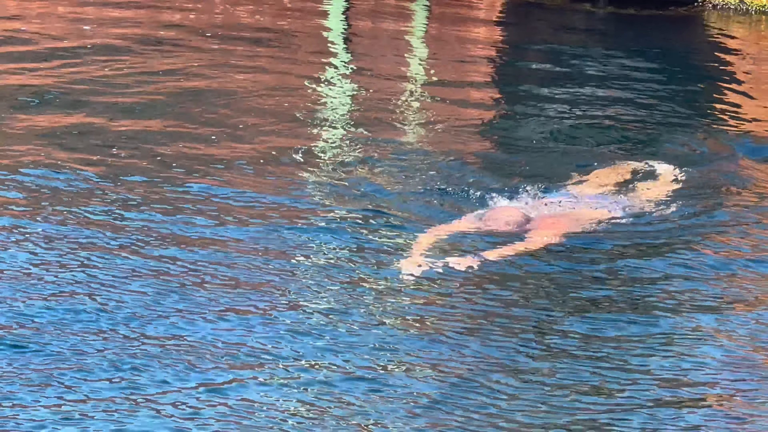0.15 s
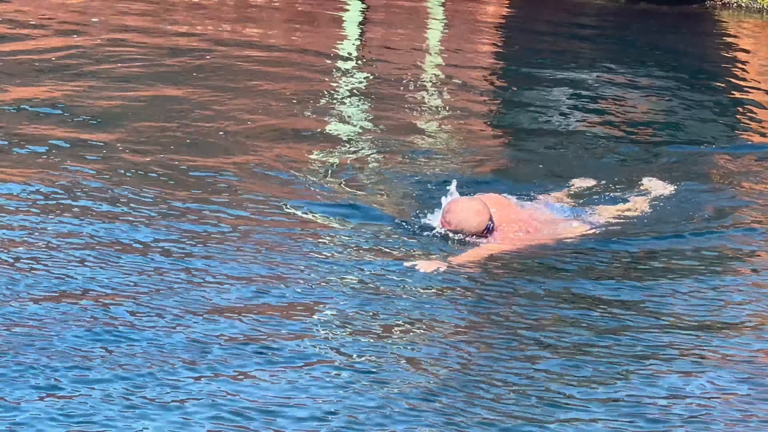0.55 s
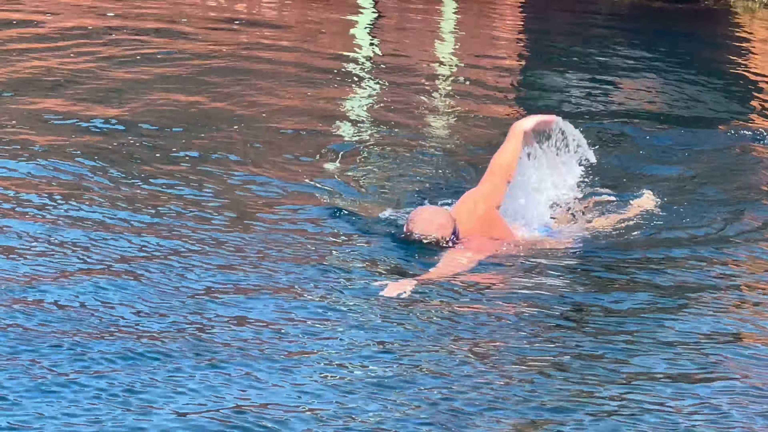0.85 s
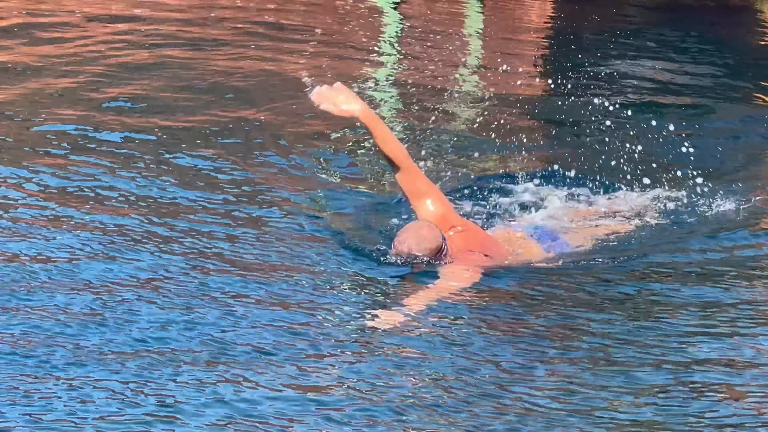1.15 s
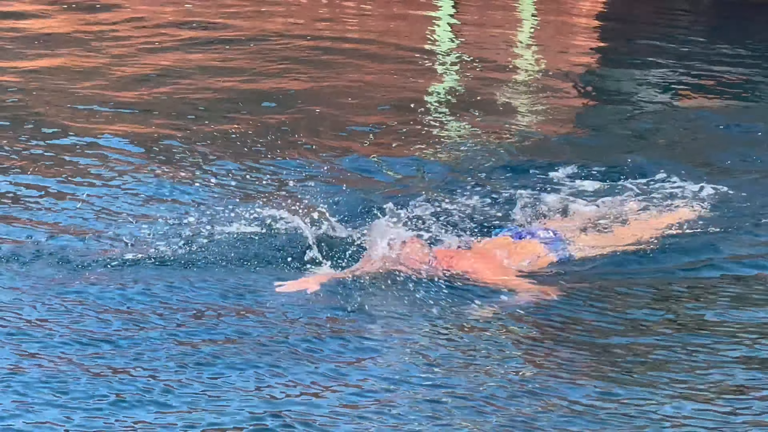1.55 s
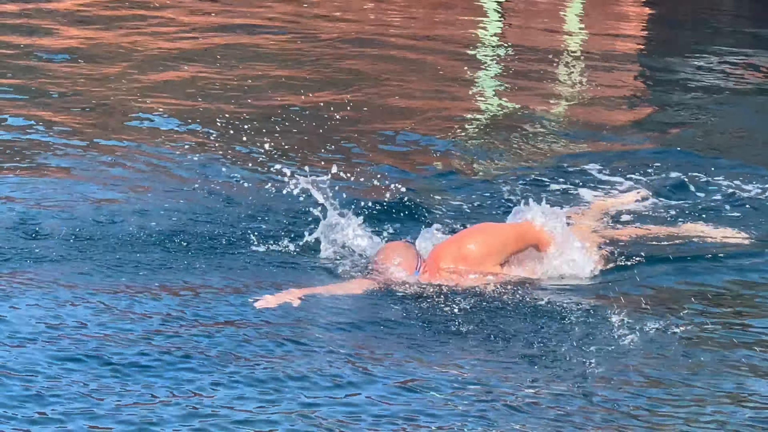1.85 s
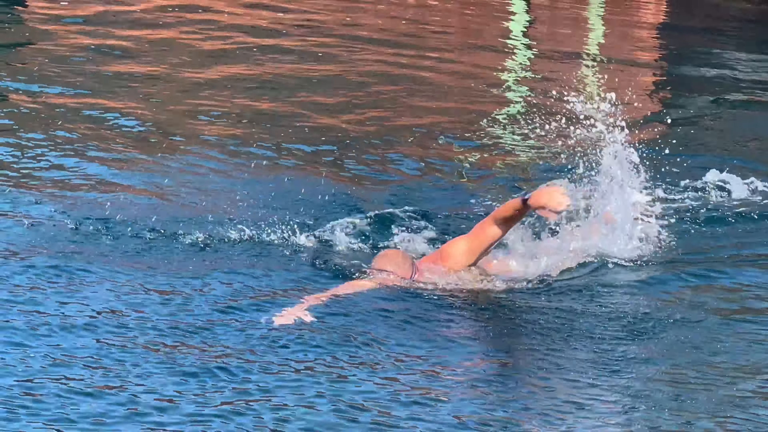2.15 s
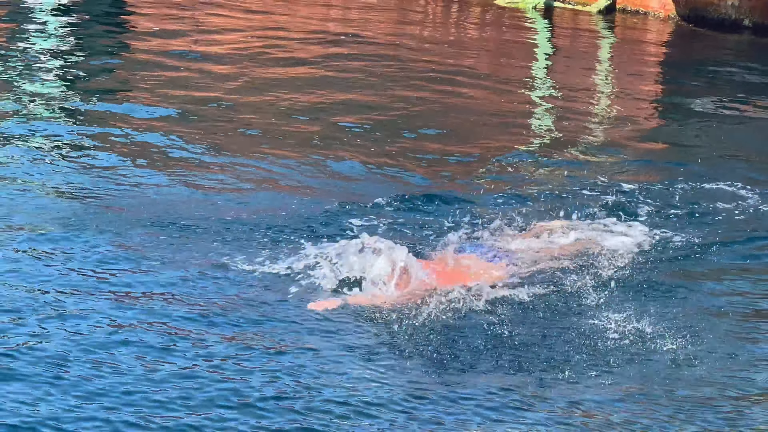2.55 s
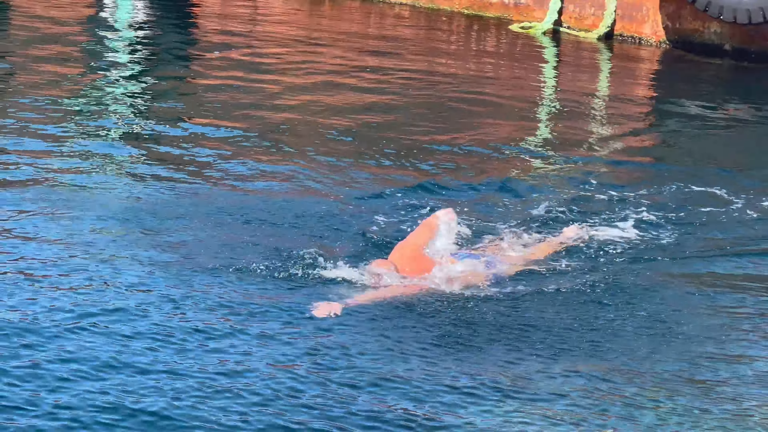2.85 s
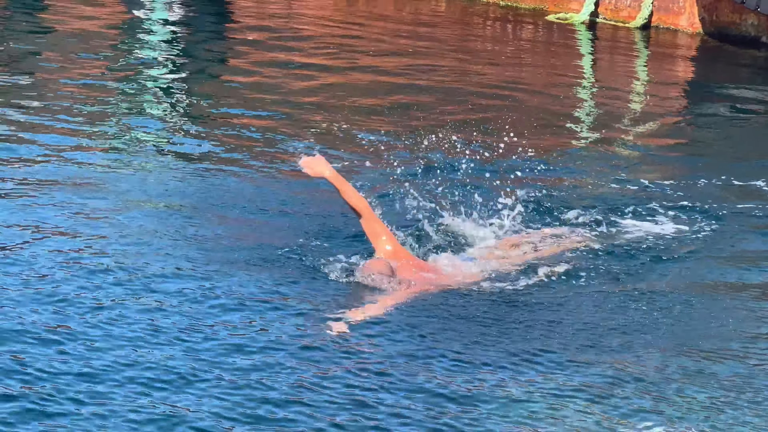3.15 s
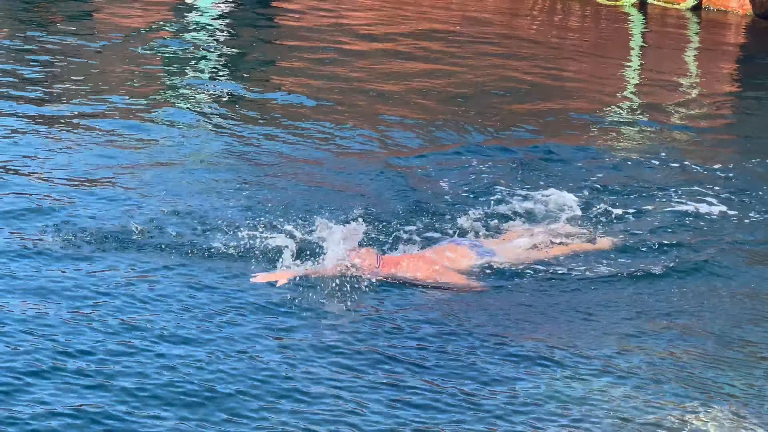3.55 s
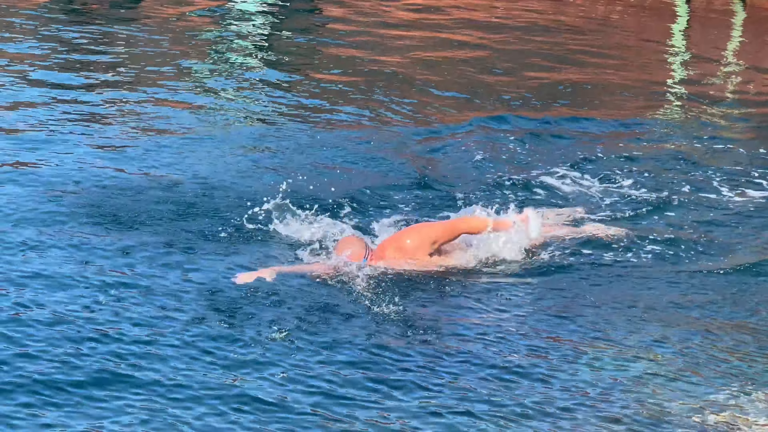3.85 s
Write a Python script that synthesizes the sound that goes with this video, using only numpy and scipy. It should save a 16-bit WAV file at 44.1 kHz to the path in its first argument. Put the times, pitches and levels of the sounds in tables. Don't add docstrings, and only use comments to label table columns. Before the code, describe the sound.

A swimmer's crawl strokes splash in harbour water under gusty, fluttering wind on the microphone

```python
import sys
import numpy as np
from scipy import signal
from scipy.fft import rfft, irfft, next_fast_len
from scipy.io import wavfile
from scipy.ndimage import uniform_filter1d, map_coordinates

SR = 44100
rng = np.random.default_rng(int(sys.argv[2]) if len(sys.argv) > 2 else 0)


def amp(db):
    return 10 ** (np.asarray(db, float) / 20)


def write(x):
    x = np.atleast_2d(x).T
    wavfile.write(sys.argv[1], SR, np.round(np.clip(x, -1, 1) * 32767).astype(np.int16))


N = 176400

# (time [s], level [dB])
STIRRING = [
    (0.04, -69.5),
    (0.51, -72.5),
    (0.99, -61.5),
    (1.45, -64.5),
    (2.09, -55),
    (3.29, -61),
    (4.0, -53.5),
]
# (frequency [Hz], likeness [0-1])
WATER_ALIKE = [(300, 0.5), (750, 0.12), (1200, 0.81), (2000, 0.99), (15000, 0.81)]


def unit(x):
    return x / np.sqrt(np.mean(x ** 2) + 1e-20)


def along(points, hz):
    f, v = np.transpose(points)
    return np.interp(np.log(hz + 1), np.log(f + 1), v)


def curve(rows):
    return np.interp(np.arange(N) / SR, *np.transpose(rows))


def wobble(rate):
    knots = rng.standard_normal(int(N * rate / SR) + 4)
    return map_coordinates(knots, [np.arange(N) * rate / SR])


def filtered(x, response):
    m = next_fast_len(N + 8192)
    return irfft(rfft(x, m) * response(np.fft.rfftfreq(m, 1 / SR)), m)[..., :N]


def rush(spectrum, patchy_db):
    z = signal.stft(rng.standard_normal((2, N)), nperseg=512)[2]
    field = uniform_filter1d(rng.standard_normal(z.shape[1:]), size=8, axis=0)
    field = uniform_filter1d(field, size=5, axis=1)
    pair = signal.istft(z * amp(patchy_db * unit(field)), nperseg=512)[1][:, :N]
    points = [(10, -120)] + list(spectrum) + [(22050, -120)]
    return unit(filtered(pair, lambda hz: amp(along(points, hz))))


def spread(pair, alike):
    turn = lambda hz: np.arccos(np.clip(along(alike, hz), 0, 1)) / 2
    mid, side = filtered(pair, lambda hz: np.array([np.cos(turn(hz)), np.sin(turn(hz))]))
    return np.array([mid + side, mid - side])


def bursts(rows, attack_s):
    out, t = np.zeros(N + SR), np.arange(SR // 4) / SR
    for s, db, length in rows:
        rise = 1 - np.exp(-t / attack_s)
        fall = 1 + np.exp(np.clip((t - length) / (0.2 * abs(length) + 1e-4), -30, 30))
        out[round(s * SR):][:len(t)] += amp(2 * db) * rise / fall
    return np.sqrt(out[:N])


def grains(s, hz, gain, cycles, rise, size):
    t = np.arange(size) / SR
    u = t * hz[:, None] / cycles
    tone = np.sin(2 * np.pi * cycles * (u + rise * u * u / 2))
    ring = gain[:, None] * tone * np.exp(-3 * u) * (1 - np.exp(-12 * u))
    at = (s * SR).astype(int)[:, None] + np.arange(size)
    return np.bincount(at.ravel(), ring.ravel(), N + size)[:N]


def shower(per_s, mean_hz, spread_oct, scatter_db, cycles, rise, size):
    u = rng.random((int(per_s * N / SR), 3))
    hz = np.clip(mean_hz * 2 ** (spread_oct * 3.49 * (u[:, 1] - .5)), 40, 15000)
    gain = amp(-scatter_db * np.log(u[:, 2] + 1e-3)) * mean_hz / hz
    return unit(grains(u[:, 0] * N / SR, hz, gain, cycles, rise, size))


def puffs(rows, cycles):
    s, db, hz = np.transpose(rows)
    step = np.arange(4000) - 2000
    u = step / SR * hz[:, None]
    phase = 2 * np.pi * (u - 0.095 * u * u + rng.random((len(s), 1)))
    swing = amp(db)[:, None] * np.cos(phase) * np.exp(-(u / cycles) ** 2)
    at = np.clip((s * SR).astype(int)[:, None] + step, 0, N)
    return np.bincount(at.ravel(), swing.ravel(), N + 1)[:N]


def harbour():
    # (frequency [Hz], density [dB per Hz])
    wash = [(250, -15.5), (450, 2), (800, -2), (1100, -2), (1600, -11), (2800, -16), (4500, -29.5),
            (16000, -34.5)]
    wash_db, follows = -48, 0.19
    churn_db = curve(STIRRING)
    swell_db = follows * (churn_db - churn_db.mean()) + 0.47 * wobble(5.3)
    return amp(wash_db + swell_db) * spread(rush(wash, patchy_db=2.0), WATER_ALIKE)


def wind_thump(strength_db, shared_db, alike):
    # (frequency [Hz], density [dB per Hz])
    rumble = [(15, -45), (25, -8), (75, 2.5), (216, -7.5), (254, -13.5), (356, -27.5), (400, -18.5),
              (520, -34), (880, -120)]
    # (centre time [s], peak level [dB], pitch [Hz])
    swings = [(0.046, -22, 104), (0.083, -28, 51.6), (0.21, -22, 89), (0.301, -22, 114), (0.342, -23.5, 92),
              (0.698, -29, 113), (1.066, -27.5, 81), (1.209, -17.5, 110), (1.302, -26.5, 74.4),
              (1.42, -26, 90), (1.469, -23, 111), (1.516, -24, 158), (1.572, -25.5, 110),
              (1.722, -26.5, 74.6), (1.796, -21.5, 71), (1.906, -23, 100), (1.977, -24, 82),
              (2.015, -27.5, 100), (2.058, -20.5, 97), (2.243, -22.5, 116), (2.316, -22.5, 105),
              (2.369, -27, 76), (2.563, -27, 134), (2.764, -27, 89), (2.848, -27.5, 67.4), (2.972, -24, 79),
              (3.011, -27.5, 100), (3.084, -22.5, 80), (3.154, -25, 108), (3.266, -22.5, 99.6),
              (3.299, -22, 113), (3.329, -23, 81), (3.426, -27, 77), (3.477, -26.5, 71), (3.516, -20.5, 98),
              (3.691, -18, 81), (3.806, -21, 98), (3.846, -24, 97), (3.915, -26.5, 66), (3.992, -25.5, 74)]
    bed_db, duck = -1.5, 0.41
    sway = amp(.5 * shared_db + wobble(14))
    bed = amp(strength_db + bed_db) * unit(sway * spread(rush(rumble, patchy_db=1.5), alike))
    heaves = puffs(swings, cycles=0.94)
    heave_level = np.sqrt(np.abs(uniform_filter1d(heaves ** 2, size=900)))
    return heaves + bed / (1 + duck * heave_level / amp(strength_db))


def wind_eddies():
    # (time [s], peak level [dB], pitch [Hz])
    eddies = [(0.046, -21, 250), (0.278, -22, 271), (0.291, -19.5, 262), (0.300, -17, 303),
              (0.333, -21, 240), (0.383, -20.5, 330), (0.574, -27.5, 209), (0.651, -26, 225),
              (0.686, -26.5, 232), (1.152, -18.5, 289), (1.177, -29, 402), (1.198, -26, 380),
              (1.222, -15.5, 218), (1.2455, -15.5, 315), (1.326, -24, 320), (1.422, -18, 354),
              (1.462, -18.5, 298), (1.777, -18, 264), (1.824, -18, 302), (2.179, -22.5, 217),
              (2.214, -25.5, 212), (2.353, -23, 269), (2.834, -19, 240), (2.946, -16, 266),
              (3.061, -20, 300), (3.246, -22.5, 277), (3.308, -20, 227), (3.724, -22, 257),
              (3.905, -12.5, 266), (3.913, -16.5, 265)]
    # (centre time [s], peak level [dB], pitch [Hz])
    gulps = [(0.041, -30, 288), (0.059, -26.5, 230), (0.205, -29, 254), (0.268, -32, 284),
             (1.266, -24, 251), (1.415, -25.5, 348), (1.712, -27.5, 233), (1.842, -28.5, 354),
             (1.942, -27.5, 310), (2.051, -33.5, 223), (2.43, -26.5, 246), (2.481, -29, 270),
             (2.53, -31, 258), (2.55, -25, 247), (2.659, -28.5, 310), (2.675, -26.5, 278),
             (2.783, -27, 285), (2.964, -22, 259), (3.0, -28.5, 271), (3.103, -26, 290), (3.398, -34, 274),
             (3.51, -27, 283), (3.533, -31.5, 255), (3.572, -29.5, 300), (3.704, -30, 274),
             (3.759, -31, 302), (3.861, -27.5, 253), (3.873, -28, 266), (3.952, -25, 346),
             (3.973, -28, 195)]
    start_ratio, ring_db, top_hz = 1.574, 2.5, 1000
    s, db, hz = np.transpose(eddies)
    rings = grains(s, start_ratio * hz, amp(db + ring_db), cycles=4.88, rise=-0.63, size=2500)
    return filtered(rings, lambda f: 1 / (1 + (f / top_hz) ** 4)) + puffs(gulps, cycles=1.38)


def wind_flutter(strength_db, shared_db, alike):
    # (frequency [Hz], density [dB per Hz])
    turbulence = [(60, 2), (150, -6), (250, 0.5), (450, -7.5), (700, -18), (1200, -63.5)]
    flutter_db, grows, swirl_db = -9, 1.44, 1
    mean_db = strength_db.mean()
    gust = amp(flutter_db + mean_db + grows * (strength_db - mean_db))
    lumps = unit(amp(shared_db + 3 * wobble(30) + 3.5 * wobble(70)))
    swirls = np.array([shower(70, 320, spread_oct=0.607, scatter_db=2, cycles=4.37, rise=-0.47, size=2500)
                       for _ in range(2)])
    soft = filtered(swirls, lambda hz: 1 / (1 + (hz / 650) ** 4))
    rough = lumps * spread(rush(turbulence, patchy_db=1.0), alike)
    return gust * (rough + amp(swirl_db) * spread(soft, alike))


def wind():
    # (time [s], strength [dB])
    gusts = [(.04, -32), (.33, -31), (.5, -42.5), (.66, -34.5), (.93, -48), (1.1, -34), (1.22, -26.5),
             (1.45, -33), (1.63, -36), (1.78, -29), (2.3, -33), (2.45, -32), (2.9, -33), (3.0, -27.5),
             (3.22, -38.5), (3.27, -31), (3.5, -35), (3.75, -28)]
    alike = [(50, 0.84)]
    right_db = 0.17
    port_top, rumble_cut_hz = 0.2, 32
    strength_db = curve(gusts)
    shared_db = 2.5 * wobble(16)
    low = wind_thump(strength_db, shared_db, alike) + wind_eddies()
    air = amp([[0], [right_db]]) * low + wind_flutter(strength_db, shared_db, alike)
    limited = port_top * np.tanh(air / port_top)
    return filtered(limited, lambda f: 1 / (1 + (rumble_cut_hz / (f + 1)) ** 6))


def spray_and_foam(churn, sheets):
    # (frequency [Hz], density [dB per Hz])
    fizz = [(500, -38), (1150, 2), (1650, -5.5), (2150, -3), (3000, -4), (8000, -12), (11000, -15.5),
            (16000, -19.5)]
    # (time [s], peak level [dB], brightness [dB])
    slaps = [(0.7487, -49, -31), (1.102, -43, -20), (1.267, -53, -13), (1.3896, -39.5, -11),
             (1.3979, -27, -26.5), (1.4352, -35.5, -11), (1.442, -41, -12), (1.471, -42, -24),
             (1.623, -38.5, -26), (1.6935, -47, -29), (1.7759, -40.5, -24), (1.872, -37.5, -34),
             (1.9115, -34.5, -27), (2.0283, -44, -31), (2.2443, -57, -13), (2.3294, -53, -3),
             (2.4176, -33, -14), (2.53, -40, -15), (2.6374, -39, -21), (2.694, -42.5, -10),
             (2.785, -37, -22), (3.1767, -45, -19), (3.3287, -38.5, -15), (3.3563, -31, -17),
             (3.395, -37, -16), (3.413, -29.5, -20), (3.423, -32.5, -12), (3.5179, -43, -12.5),
             (3.7012, -44, -12)]
    slap_s, slap_db, usual_bright_db = 0.0061, -9, -21
    foam = rush(fizz, patchy_db=2.0)
    top = filtered(foam, lambda hz: 1 / (1 + (9000 / (hz + 1)) ** 6))
    patter = unit(amp(1.23 * wobble(18) + 1.46 * wobble(150) + 2.2 * wobble(600)))
    bed = np.hypot(1.365 * churn, sheets) * patter
    rattle = amp(slap_db) * unit(amp(1.5 * wobble(400)))
    dull = [(s, db, slap_s) for s, db, _ in slaps]
    bright = [(s, db + b - usual_bright_db, slap_s) for s, db, b in slaps]
    body = np.hypot(bed, rattle * bursts(dull, attack_s=0.00065))
    shine = np.hypot(bed, rattle * bursts(bright, attack_s=.001))
    return spread(body * (foam - top) + shine * top, WATER_ALIKE)


def drops_and_bubbles(churn, sheets):
    drops_db, bubbles_db = -9, 2
    drops = amp(drops_db) * shower(410, 5220, spread_oct=0.79, scatter_db=-2.5,
                                   cycles=1.2, rise=0.17, size=300)
    bubbles = amp(bubbles_db) * shower(120, 1770, spread_oct=0.618, scatter_db=2,
                                       cycles=7.4, rise=0.24, size=900)
    return np.hypot(churn, 0.63 * sheets) * drops + np.hypot(churn, 0.24 * sheets) * bubbles


def plops():
    # (time [s], peak level [dB], pitch [Hz])
    pockets = [(1.4005, -29.5, 1870), (1.400, -31.5, 2400), (1.401, -32, 1430), (1.7379, -34.5, 1350),
               (1.399, -28, 3060), (1.937, -30.5, 1200), (1.9968, -28.5, 1400), (2.139, -27.5, 683),
               (2.178, -27.5, 840), (2.2156, -33, 920), (2.237, -35, 720), (2.258, -33, 720),
               (2.32, -39, 702), (0.255, -32.5, 785), (2.424, -32, 940), (2.4474, -36, 2000),
               (2.725, -29.5, 1114), (2.9647, -40, 1070), (3.5865, -33, 805), (3.722, -28, 580),
               (3.7184, -32, 1910), (3.7692, -30, 850), (3.899, -31, 966)]
    plop_db = 1
    s, db, hz = np.transpose(pockets)
    return grains(s, hz, amp(db + plop_db), cycles=10, rise=.15, size=1500)


def swimmer():
    # (time [s], level [dB], length [s])
    falling = [(.785, -57.5, 0.064), (1.0, -66, 0.12), (1.405, -44, 0.038), (1.975, -47.5, 0.039),
               (2.425, -48, 0.022), (2.615, -50.5, 0.048), (2.89, -51, 0.029), (3.357, -49, 0.034),
               (3.39, -45.5, 0.043), (3.6, -49.5, 0.037), (3.71, -52.5, 0.16), (3.89, -45, 0.029)]
    churn = amp(curve(STIRRING))
    sheets = bursts(falling, attack_s=0.0035)
    return spray_and_foam(churn, sheets) + drops_and_bubbles(churn, sheets) + plops()


def scene():
    # (frequency [Hz], left over right [dB])
    lean = [(300, 8), (750, 1.5), (1250, 4.5), (2000, 0)]
    # (frequency [Hz], left leads by [radians])
    lead = [(0, 0), (860, .6), (1460, -.3), (2300, 0), (3450, .7), (7200, 0), (10000, -3.14),
            (13500, -6.28), (16000, -8)]
    # (frequency [Hz], half width [Hz], level [dB])
    cavity = [(1104, 140, 1), (2020, 170, 3)]

    def paths(hz):
        left = amp(along(lean, hz) / 2) * np.exp(.5j * np.interp(hz, *np.transpose(lead)))
        return left ** np.array([[1], [-1]])

    housing = lambda hz: amp(sum(db / (1 + ((hz - c) / w) ** 2) for c, w, db in cavity))
    return filtered(swimmer() + harbour(), lambda hz: paths(hz) * housing(hz)) + wind()


def gapped(x, gaps):
    wander_hz, open_share, top_hz = 130, .035, 15830
    hz, t, z = signal.stft(x, SR, nperseg=2048)
    u = rng.random(len(t))
    for a, b in gaps:
        shift = wander_hz * np.round(uniform_filter1d(rng.standard_normal((2, len(t))), size=3) * 2)
        inside = (hz[:, None] > a + shift[0]) & (hz[:, None] < b + shift[1])
        z[inside & (u > open_share)] = 0
    return filtered(signal.istft(z, SR, nperseg=2048)[1][:N], lambda f: f < top_hz)


def band_limit(x):
    return signal.sosfilt(signal.butter(12, 16500, fs=SR, output="sos"), x)


def record(dry):
    # (from [Hz], to [Hz])
    mid_gaps = [(9250, 10650), (15550, 17000)]
    # (from [Hz], to [Hz])
    side_gaps = [(1950, 2600), (5200, 5800), (6300, 7600), (12700, 14450)]
    start_s, kick, kick_s = .0362, 0.053, 0.0026
    mid = gapped(dry[0] + dry[1], mid_gaps) / 2
    side = gapped(dry[0] - dry[1], side_gaps) / 2
    t = np.arange(N) / SR - start_s
    pair = np.array([mid + side, mid - side]) + kick * np.exp(-np.abs(t) / kick_s)
    return band_limit(pair * (t >= 0))


dry = scene()
out = record(dry)
write(out)
```